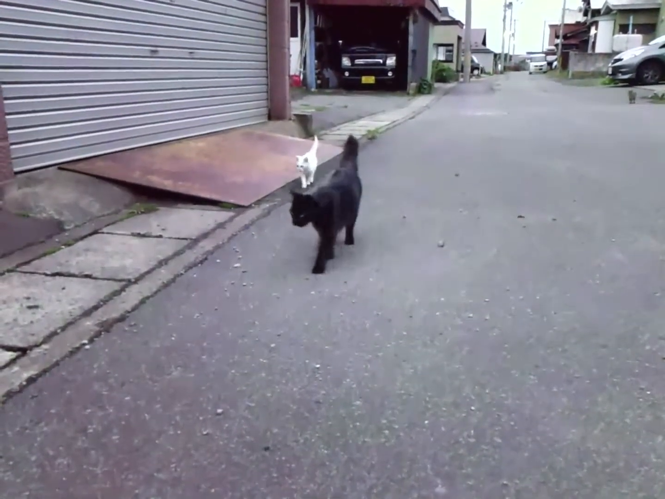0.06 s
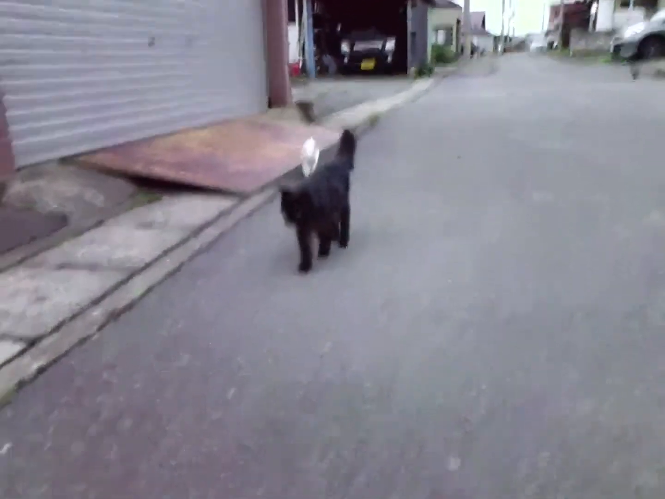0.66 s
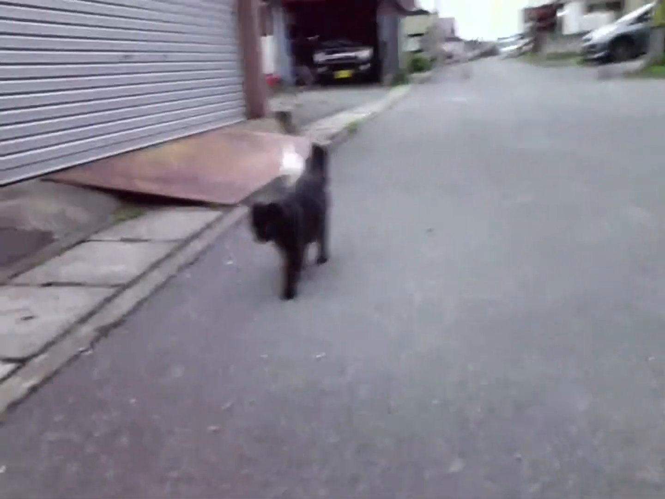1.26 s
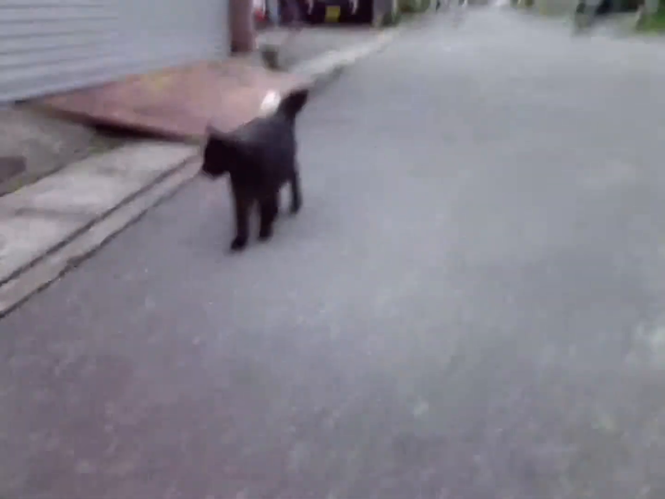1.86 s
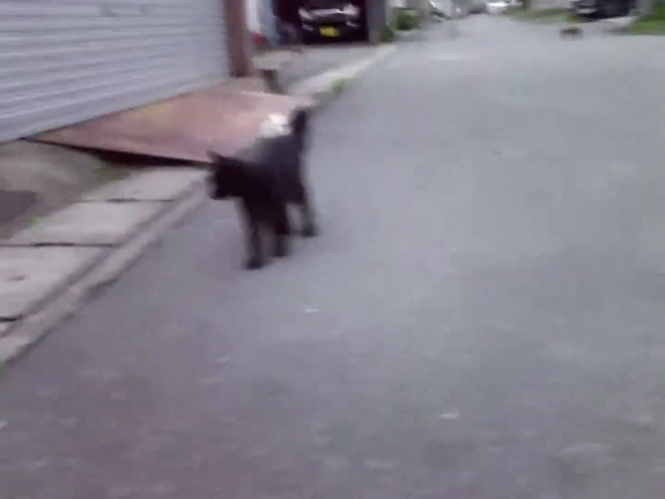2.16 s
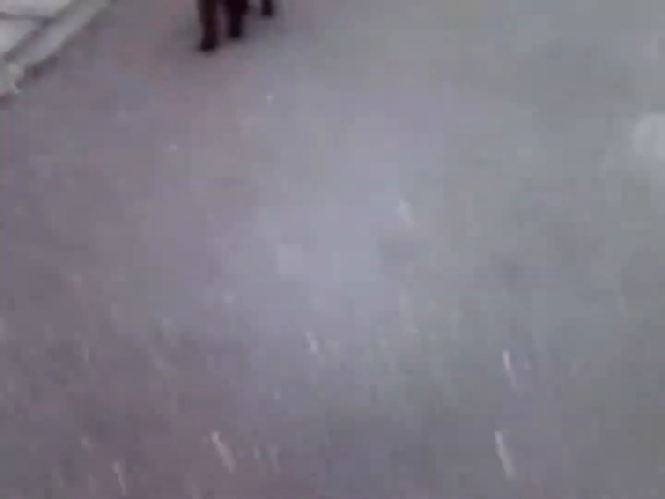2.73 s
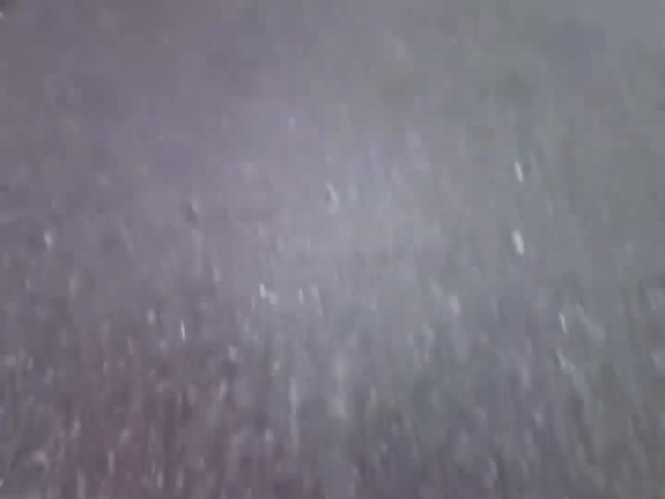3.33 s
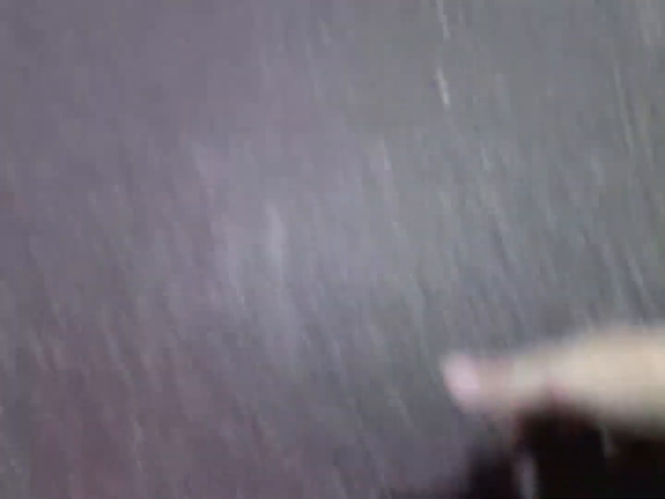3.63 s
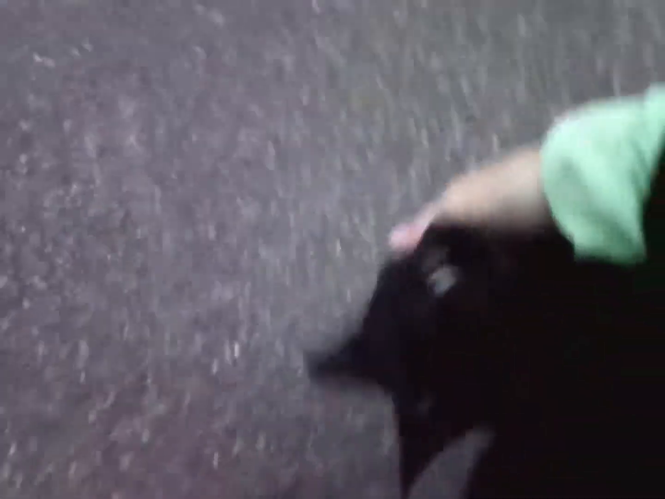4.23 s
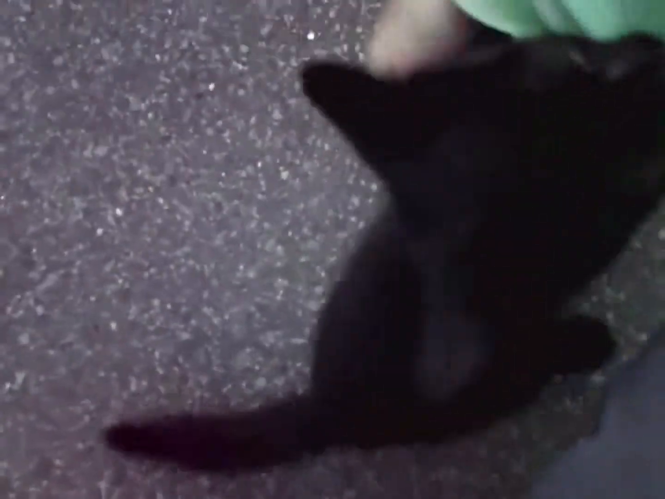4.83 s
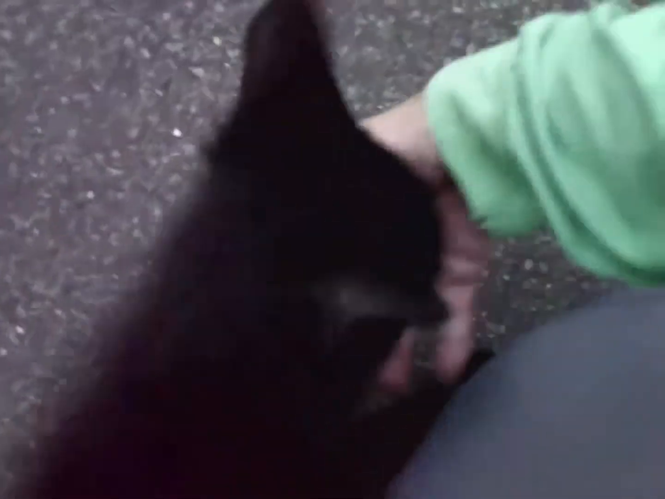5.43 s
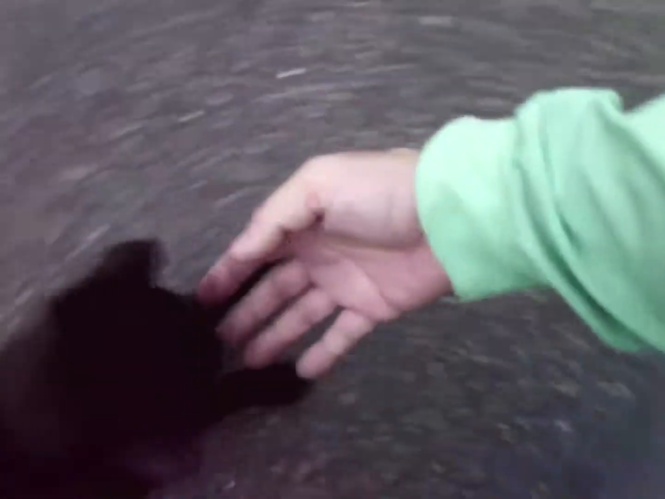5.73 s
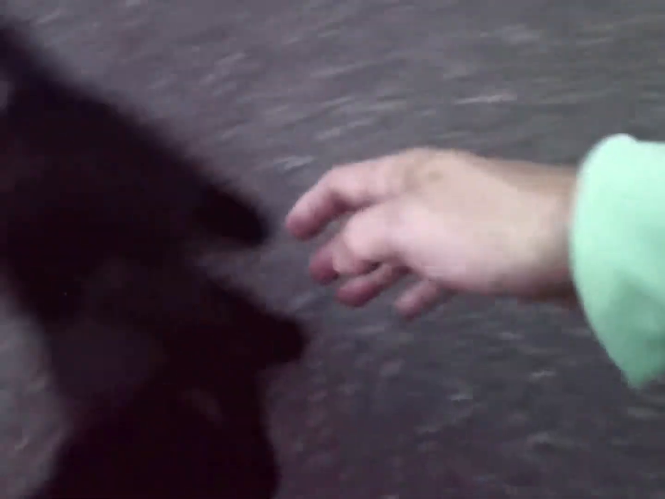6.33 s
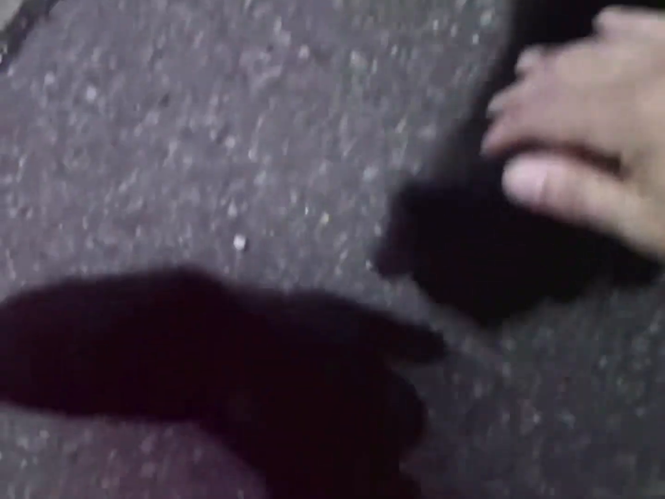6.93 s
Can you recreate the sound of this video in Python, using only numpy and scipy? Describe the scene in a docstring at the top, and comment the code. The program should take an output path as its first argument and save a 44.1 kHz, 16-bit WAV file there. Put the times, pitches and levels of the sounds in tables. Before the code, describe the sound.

Sharp handling clicks on a phone case give way to soft cloth brushing and four faint crow caws, over a low town rumble.

```python
"""A quiet street: the town rumbles, a far engine gathers speed, and a phone hisses and whines faintly.
The phone is carried toward a cat. Fingers rub, click and press on its case, and each click makes
the microphone hole ring near 5 kHz. A sleeve swishes as the arm reaches out to stroke the cat,
and a distant crow caws four times, echoed by the houses."""
import sys
import numpy as np
from scipy import signal
from scipy.fft import rfft, irfft, next_fast_len
from scipy.io import wavfile
from scipy.ndimage import map_coordinates

SR = 44100
rng = np.random.default_rng(int(sys.argv[2]) if len(sys.argv) > 2 else 0)


def dump_mix(stems):
    """Bounce the given channels to the path in sys.argv[1] as a 16-bit WAV at rate SR."""
    frames = np.atleast_2d(stems).T  # one column per channel
    limited = np.clip(frames, -1, 1)  # hard clip at full scale
    pcm = np.round(limited * 32767).astype(np.int16)
    wavfile.write(sys.argv[1], SR, pcm)


N = 307844

# the tone of light brushing, by skin or cloth: pitch_hz, level_db
BRUSH_TONE = [(1500, -18.5), (3000, -14.5), (4100, -6.5), (4750, 4), (5300, 0), (6200, -12), (7000, -16.5),
              (8500, -44), (16000, -48)]


def amp(db):
    """Turn decibels into a number to multiply by."""
    return 10 ** (np.asarray(db) / 20)


def wobble(rate):
    """A smooth random curve through `rate` points a second."""
    points = rng.standard_normal(int(N * rate / SR) + 4)
    return map_coordinates(points, [np.arange(N) * rate / SR])


def filtered(x, response):
    """Turn each frequency in x up or down by response(hz)."""
    size = next_fast_len(N + SR // 2)
    return irfft(rfft(x, size) * response(np.fft.rfftfreq(size, 1 / SR)), size)[:N]


def colour(x, tone):
    """Shape x by (pitch_hz, level_db) points, at an average (rms) strength of 1."""
    pitches, db = np.transpose(tone)
    shaped = filtered(x, lambda hz: amp(np.interp(np.log(hz + 1), np.log(pitches), db)))
    return shaped / np.sqrt(np.mean(shaped ** 2) + 1e-20)


def add(track, start_s, sound):
    """Mix a sound into the track."""
    start = max(round(start_s * SR), 0)
    track[start:start + len(sound)] += sound[:max(N - start, 0)]


def friction(tone, grain_db):
    """Rubbing noise, made of tiny slips of uneven strength."""
    return colour(rng.standard_normal(N) * amp(grain_db * wobble(700)), tone)


def strokes(rows, rest_db=-np.inf):
    """A loudness curve: each stroke is 8.5 dB down at rise_s before its peak and fall_s after it."""
    t = np.arange(0, N, 64) / SR
    power = amp(rest_db) ** 2
    for peak_s, rise_s, fall_s, level_db in rows:
        away = np.maximum((peak_s - t) / rise_s, (t - peak_s) / fall_s)
        power = power + amp(level_db - 8.5 * away ** 1.37) ** 2
    return np.interp(np.arange(N) / SR, t, np.sqrt(power))


def strike(notes, contact_s, band_hz):
    """A tap and its brief chatter ring an object's own notes, each fading 60 dB in its ring_s."""
    t = np.arange(SR // 10) / SR
    force = 0.091 * rng.standard_normal(SR // 100) * np.exp(-t[:SR // 100] / contact_s)
    force[0] += 1  # the tap itself
    ring = sum(amp(db + 4.5 * rng.normal() - 60 * t / ring_s) * np.sin(2 * np.pi * hz * t)
               for hz, db, ring_s in notes)
    band = signal.butter(2, band_hz, "band", fs=SR, output="sos")
    sound = signal.sosfilt(band, np.convolve(force, ring))
    return sound / np.sqrt(np.sum(sound ** 2) / (SR // 1000))  # same energy for every tap


def background():
    """The town rumbles steadily while the phone's electronics hiss and whine."""
    # the town's low rumble: pitch_hz, level_db
    town_tone = [(10, -15.5), (25, 2.5), (60, -0.5), (100, -3), (160, -7), (250, -11), (400, -14),
                 (630, -22.5), (1000, -26), (2000, -35.5), (4000, -40.5)]
    # the microphone's hiss: pitch_hz, level_db
    hiss_tone = [(1000, 6.5), (2500, 4), (3600, 3), (4900, 1), (6000, 3), (6800, 8), (8500, -0.5),
                 (11000, -1.5), (16000, -4.5)]
    # thin electronic notes: pitch_hz, level_db
    whine_notes = [(7838, -78), (7897, -92), (15735, -92)]
    t = np.arange(N) / SR
    whine = sum(amp(db) * np.sin(2 * np.pi * hz * t + 0.5 * wobble(15)) for hz, db in whine_notes)
    rumble = amp(-51) * colour(rng.standard_normal(N), town_tone)
    hiss = amp(-67) * colour(rng.standard_normal(N), hiss_tone)
    return rumble + hiss + np.sqrt(2) * whine


def engine():
    """Only a far engine's lowest notes reach the street: 1, 2 and 3 times its firing rate."""
    # the engine speeding up: time_s, firing_hz, level_db
    speed_up = [(0, 82.2, -63.5), (0.55, 89.4, -58), (0.98, 91.86, -59), (1.25, 97.7, -58.5),
                (1.6, 100.4, -56), (2.4, 100.8, -58), (3.2, 101.6, -66), (4, 101.9, -58.5), (5, 102, -55.5),
                (5.95, 103, -54.5), (6.3, 105, -55), (6.98, 106.6, -50)]
    # its three notes, lowest first: level_db
    note_levels = (-2, -15, -15.5)
    # the exhaust booms when a note passes these pitches: pitch_hz, width_hz, boost_db
    booms = [(180.6, 10.3, 20.5), (204.3, 3, 7.5)]
    t = np.arange(N) / SR
    times, rates, levels = np.transpose(speed_up)
    firing_hz, level_db = np.interp(t, times, rates), np.interp(t, times, levels)
    phase = 2 * np.pi * np.cumsum(firing_hz * (1 + 0.0027 * wobble(8))) / SR
    throb_db = 3.2 * np.cos(2 * np.pi * (t - 5.34) / 0.45)  # the lowest note swells every 0.45 s
    out = np.zeros(N)
    for k, note_db in enumerate(note_levels, 1):
        boom_db = sum(db / (1 + ((k * firing_hz - hz) / width) ** 2) for hz, width, db in booms)
        waver_db = (k == 1) * throb_db + 1.25 * wobble(9.6)
        out += amp(level_db + note_db + boom_db + waver_db) * np.sin(k * phase)
    return np.sqrt(2) * out


def fingers():
    """Skin creeps on the case, scuffs as the grip shifts, and now and then slides."""
    # soft scuffs of the hand: peak_s, rise_s, fall_s, level_db
    grip_shifts = [(0.29, 0.067, 0.054, -63.5), (0.43, 0.05, 0.042, -63.5), (0.55, 0.03, 0.04, -63),
                   (1.02, 0.078, 0.081, -61), (1.67, 0.22, 0.13, -62.5), (1.85, 0.052, 0.066, -61.5),
                   (2.38, 0.28, 0.36, -58.5), (2.78, 0.033, 0.086, -52.5), (3.12, 0.15, 0.25, -60)]
    # fingertip slides: peak_s, rise_s, fall_s, level_db
    rubs = [(0.46, 0.013, 0.01, -55), (1.38, 0.026, 0.005, -52.5), (2.025, 0.022, 0.015, -52),
            (2.141, 0.029, 0.023, -45), (2.225, 0.093, 0.025, -49.5), (2.325, 0.019, 0.0092, -44),
            (2.422, 0.015, 0.0039, -44.5), (2.627, 0.0095, 0.034, -51.5), (2.732, 0.013, 0.0046, -42),
            (2.853, 0.0037, 0.0086, -35), (2.89, 0.012, 0.036, -52), (4.44, 0.02, 0.027, -49)]
    # the tone of sliding skin: pitch_hz, level_db
    skin_tone = [(600, -5.5), (2500, -12), (4000, -4), (5200, 6), (6000, 2), (7000, -4), (8500, -15.5),
                 (12000, -32), (16000, -34)]
    slides = strokes(rubs) * friction(skin_tone, grain_db=3.5)
    scuffing = strokes(grip_shifts, rest_db=-72.5) * amp(1.5 * wobble(30))
    return slides + scuffing * friction(BRUSH_TONE, grain_db=2)


def case_clicks():
    """Hard taps ring the phone's microphone hole, body and rim; the grip sets the knock's pitch."""
    # taps on the case: start_s, level_db, knock_db, rim_db, knock_hz, contact_s
    taps = [(0.4337, -36, -25, -19, 1330, 0.0011), (1.0245, -4, -21, -13, 920, 0.0016),
            (1.32, -38.5, -12.5, -23, 960, 0.001), (1.3826, -23, -22, -7.5, 1040, 0.0017),
            (1.705, -38.5, -4, -25, 795, 0.0011), (2.1381, -18.5, -16, -10, 1030, 0.0018),
            (2.1606, -25.5, -22, -6, 842, 0.0027), (2.3215, -20.5, -23, -25, 958, 0.00043),
            (2.3315, -21.5, -31, -6, 810, 0.0018), (2.3392, -18.5, -7.5, -26, 1110, 0.002),
            (2.368, -36, -20, -11, 1250, 0.0015), (2.4066, -30, -37, 3, 961, 0.0009),
            (2.457, -26.5, -14.5, -8, 850, 0.0046), (2.4842, -23.5, -15, -30, 1220, 0.0011),
            (2.5616, -41.5, -8.5, -19, 836, 0.00065), (2.7755, -10, -15.5, -16, 945, 0.00047),
            (2.7895, -17.5, -13.5, -13, 950, 0.0013), (2.7959, -24, -11.5, -21, 1350, 0.0024),
            (2.8497, -26.5, -4.5, -14, 1020, 0.0011), (3.2793, -10, -18, -1.5, 1160, 0.0009),
            (4.7218, -34.5, -22, -6, 811, 0.002), (4.8259, -31.5, -15, -27, 909, 0.0011),
            (6.8103, -37, -18, -26, 1300, 0.0011)]
    # the microphone hole's notes: pitch_hz, level_db, ring_s
    hole_notes = [(4890, -13.5, 0.02), (5160, 4.5, 0.0051), (5700, -16.5, 0.0036), (5205, -41, 0.21)]
    # the body's notes above the knock: pitch_hz, level_db, ring_s
    body_notes = [(1700, -1.5, 0.0091), (2030, 1.5, 0.0089), (2560, 5, 0.0038), (3350, 2, 0.0056)]
    # the rim's high notes: pitch_hz, level_db, ring_s
    rim_notes = [(6950, -9, 0.0094), (7070, -9, 0.0017), (8250, -17, 0.0028), (10500, -32, 0.0023)]
    out = np.zeros(N)
    for start_s, level_db, knock_db, rim_db, knock_hz, contact_s in taps:
        hole = strike(hole_notes, contact_s, band_hz=(4120, 6500))
        knock_notes = [(knock_hz, 0, 0.015), (knock_hz * 1.43, -7, 0.007), (knock_hz * 0.39, -10, 0.006)]
        knock = strike(knock_notes, contact_s, band_hz=(467, 1940))
        body = amp(-1.5) * strike(body_notes, contact_s, band_hz=(1270, 3870))
        rim = amp(rim_db - 6) * strike(rim_notes, contact_s, band_hz=(5700, 9250))
        t = np.arange(len(hole)) / SR
        crack = amp(-25 - 60 * t / 0.009) * rng.standard_normal(len(t))
        click = hole + amp(knock_db + 5) * (knock + body) + rim + crack
        add(out, start_s, amp(level_db - 6.5) * click)
    return out


def small_ticks():
    """Light taps each ring one short note."""
    # light taps: start_s, level_db, pitch_hz
    ticks = [(0.922, -42, 3980), (2.061, -41.5, 780), (2.389, -45, 2400), (2.623, -43, 1044),
             (2.729, -30, 4180), (2.734, -37, 4250), (3.153, -40, 2810), (3.220, -43, 2360),
             (3.251, -40, 4640), (4.766, -38.5, 1086), (6.3, -41.5, 1144), (6.624, -40.5, 1300)]
    out = np.zeros(N)
    for start_s, level_db, hz in ticks:
        tick = strike([(hz, 0, 9 / hz)], contact_s=0.0031, band_hz=(hz / 2, hz * 2))
        add(out, start_s, amp(level_db - 3.5) * tick)
    return out


def palm_thumps():
    """The palm presses on the case; the pressure swings back once and settles."""
    # presses of the palm: start_s, level_db, pitch_hz
    presses = [(1.023, -33, 272), (1.705, -36, 270), (2.7754, -22.5, 57), (2.787, -36, 69.6),
               (2.849, -31, 454), (4.425, -28, 48.65), (4.459, -36, 33.8)]
    out, t = np.zeros(N), np.arange(SR // 5) / SR
    for start_s, level_db, hz in presses:
        add(out, start_s, amp(level_db) * np.sin(2 * np.pi * hz * t) * np.exp(-1.7 * hz * t))
    return out


def sleeve():
    """Cloth brushes lightly, swishes when the arm swings, and crackles where threads catch."""
    # sleeve movements: peak_s, rise_s, fall_s, brush_db, swish_db, fizz_db
    moves = [(3.42, 0.15, 0.12, -64, -74, -80), (3.65, 0.18, 0.4, -47, -59.5, -74),
             (4.03, 0.29, 0.25, -53, -65.5, -74.5), (4.325, 0.02, 0.062, -50.5, -78, -68),
             (4.43, 0.062, 0.085, -46, -66, -69), (4.835, 0.31, 0.075, -52, -61.5, -72),
             (4.98, 0.08, 0.16, -51.5, -60, -68), (5.13, 0.076, 0.11, -52.5, -67, -81),
             (5.275, 0.074, 0.095, -52.5, -62, -76), (5.48, 0.22, 0.093, -49, -72, -72),
             (5.605, 0.099, 0.034, -48.5, -72, -76), (5.73, 0.012, 0.025, -51, -64, -71),
             (5.9, 0.095, 0.18, -45.5, -59, -64), (6.05, 0.11, 0.29, -46, -66.5, -65),
             (6.48, 0.51, 0.79, -51.5, -62.5, -71.5), (6.78, 0.4, 0.14, -60, -59.5, -89)]
    # the broad swish: pitch_hz, level_db
    swish_tone = [(300, -6), (800, 2), (1500, -0.5), (2800, 0), (4500, 0.5), (6000, -6.5), (7200, -17),
                  (8500, -20), (16000, -30)]
    # the airy fizz: pitch_hz, level_db
    fizz_tone = [(5000, -13.5), (7500, -4), (8600, -10.5), (10300, -8.5), (13000, -20), (16000, -24)]
    timing, levels = np.hsplit(np.array(moves), [3])
    brushing, swishing, fizzing = [strokes(np.column_stack([timing, db])) for db in levels.T]
    brush = amp(-1) * brushing * friction(BRUSH_TONE, grain_db=1.5)
    swish = amp(2.5) * swishing * friction(swish_tone, grain_db=3)
    fizz = amp(4) * fizzing * friction(fizz_tone, grain_db=1)
    catches = (rng.random(N) < 30 / SR) * rng.standard_normal(N)  # about 30 a second
    crackle = amp(-13) * swishing * colour(catches, swish_tone)
    return amp(0.69 * wobble(30)) * (brush + swish + fizz + crackle)


def crow():
    """Each hoarse caw rises and falls; from afar one hears mostly the note at 3 times its base pitch."""
    # caws, with the top pitch of their loudest note: start_s, length_s, pitch_hz, level_db
    caws = [(4.869, 0.24, 1377, -60.5), (5.386, 0.23, 1294, -55.5), (5.92, .24, 1254, -59),
            (6.457, 0.22, 1242, -58)]
    # echoes off house fronts: delay_s, level_db
    echoes = [(.07, -9), (0.132, -16), (.2, -22)]
    voice, jitter = np.zeros(N), wobble(200)
    for start_s, length_s, pitch_hz, level_db in caws:
        position = np.linspace(-1, 1, round(length_s * SR))  # 0 is the middle of the caw
        rasp = 0.022 * jitter[round(start_s * SR):][:len(position)]
        base_hz = pitch_hz / 3 * (1 - 0.22 * position ** 2 + rasp)
        phase = 2 * np.pi * np.cumsum(base_hz) / SR
        call = np.sin(3 * phase) + amp(-15) * np.sin(2 * phase) + amp(-22) * np.sin(4 * phase)
        add(voice, start_s, amp(level_db) * np.sqrt(1 - position ** 2) * call)
    voice *= amp(3 * wobble(110))  # a fast flutter adds hoarseness
    t = np.arange(SR) / SR
    tail = rng.standard_normal(SR) * amp(-60 * t / 0.89)  # the street's echo dies away in 0.89 s
    out = voice + amp(-5) * signal.fftconvolve(voice, tail / np.linalg.norm(tail))[:N]
    for delay_s, level_db in echoes:
        add(out, delay_s, amp(level_db) * voice)
    return out


def scene():
    """One microphone feeds both channels."""
    handling = case_clicks() + small_ticks() + palm_thumps() + fingers()
    mono = handling + sleeve() + engine() + crow() + background()
    return np.array([mono, mono])


def record(dry):
    """The phone cuts off the very highest treble."""
    return np.array([filtered(channel, lambda hz: hz < 15950) for channel in dry])


dry = scene()
out = record(dry)
dump_mix(out)
```